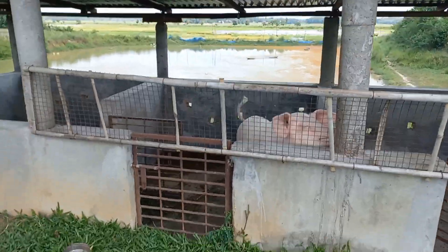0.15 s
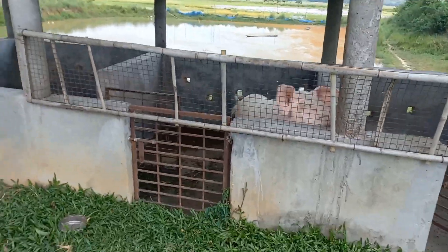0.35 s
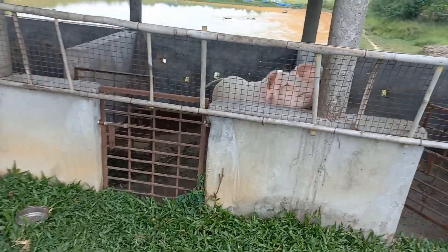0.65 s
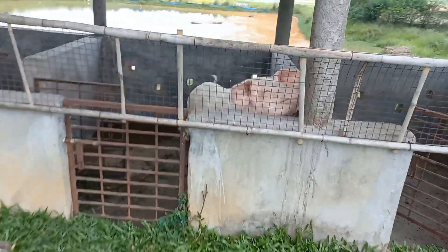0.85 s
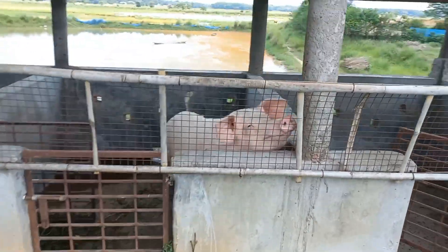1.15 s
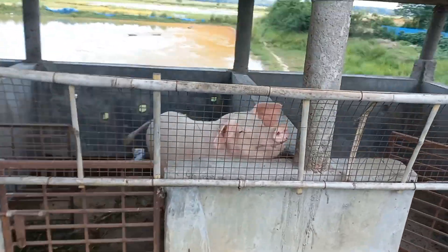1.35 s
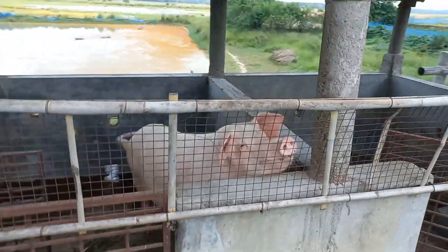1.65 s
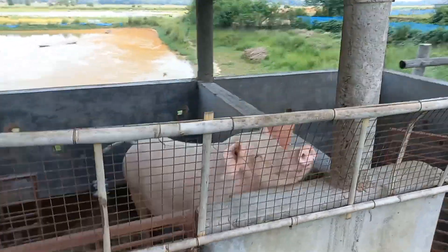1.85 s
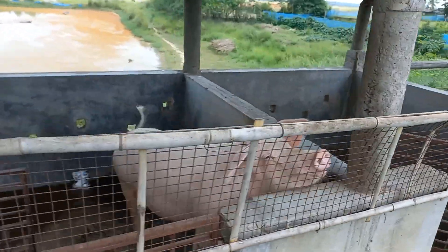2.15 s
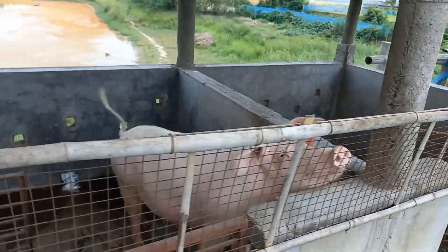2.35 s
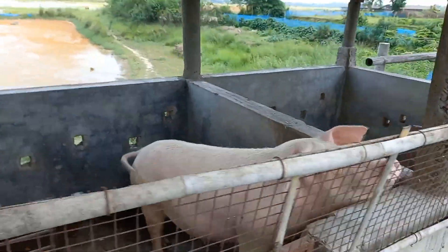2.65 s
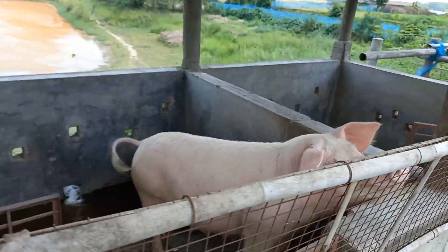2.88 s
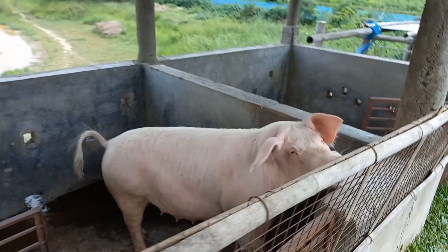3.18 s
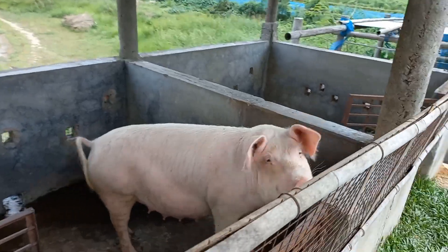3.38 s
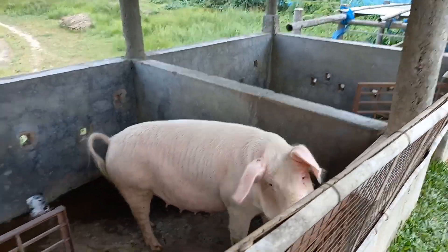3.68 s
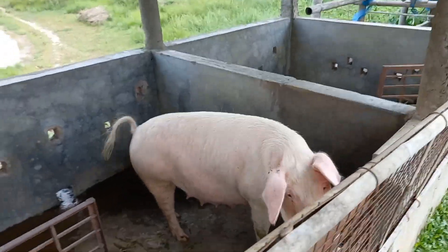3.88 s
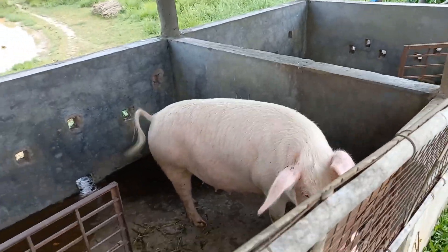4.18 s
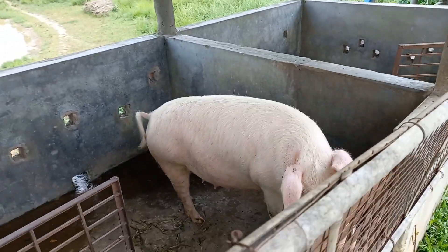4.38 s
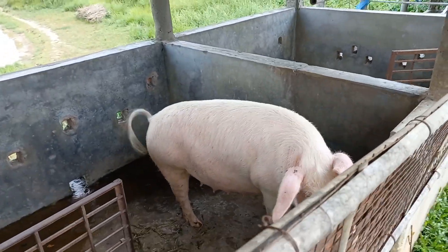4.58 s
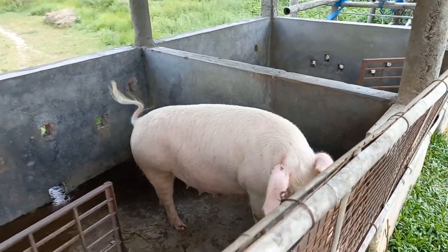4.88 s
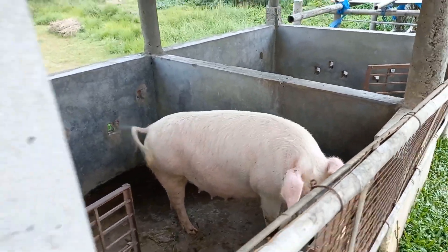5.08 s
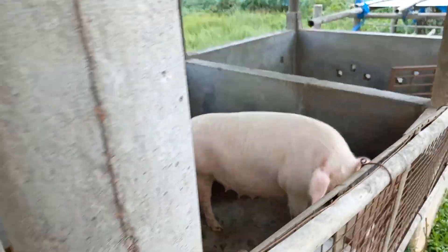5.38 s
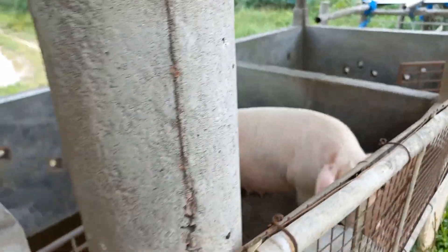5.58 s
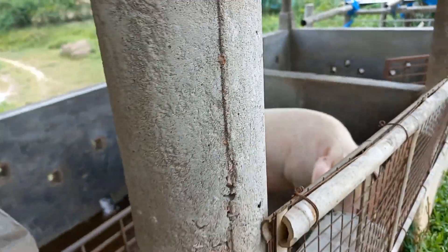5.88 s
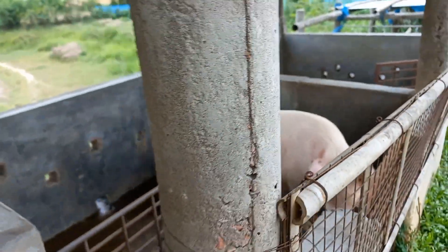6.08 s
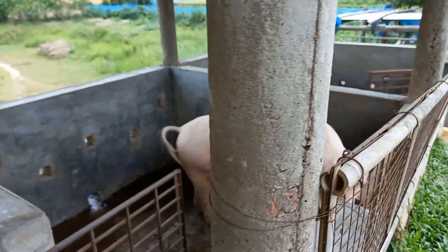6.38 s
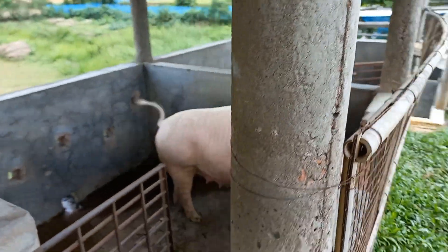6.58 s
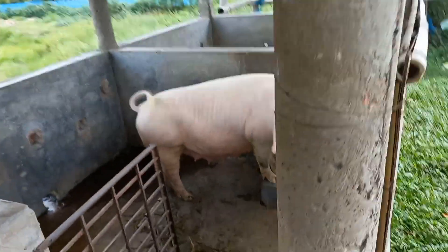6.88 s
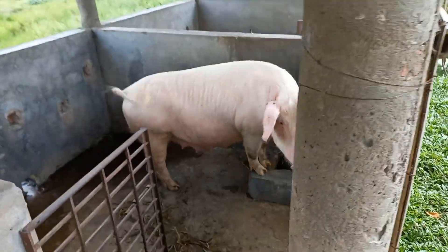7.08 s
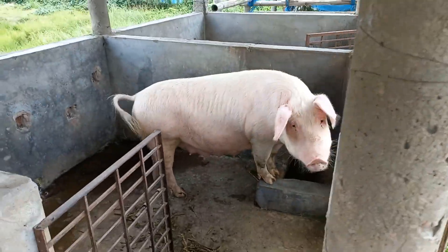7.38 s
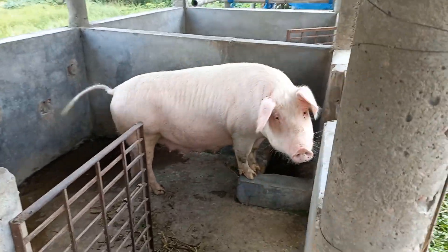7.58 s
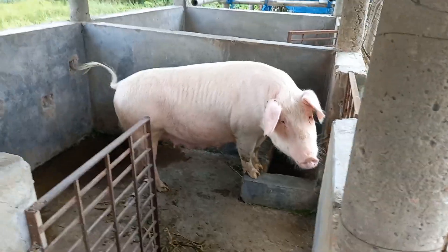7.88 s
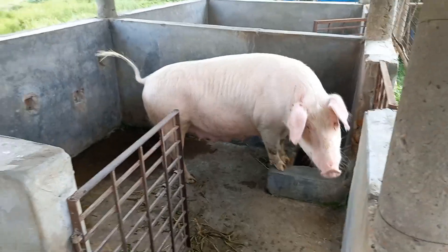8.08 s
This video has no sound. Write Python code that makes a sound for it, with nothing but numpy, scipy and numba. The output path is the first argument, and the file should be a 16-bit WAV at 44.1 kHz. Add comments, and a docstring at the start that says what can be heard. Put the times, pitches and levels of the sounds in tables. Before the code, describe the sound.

A large pig grunts continually at a farm, first softly, then loud, low and nasal. Around three seconds two calls crack into brief squeals, then shorter, more open and raspier grunts follow, easing toward the end. Bare concrete walls give a short hard echo. Someone walks through grass with soft swishes, a small bird chips, and a distant motor hums. A handheld microphone approaches the pen.

```python
"""A pig grunts two or three times a second, twice breaking into a squeal, in a roofed concrete pen.
Source and filter: uneven pulses of the vocal folds ring throat, mouth and snout; the walls answer with a short echo.
Someone walks through grass, heard as swelling hisses of noise and a few snapping stems.
A small bird chips in short upward whistles; a far motor drones as a wavering tone over the noise of the fields."""
import sys
import numpy as np
from scipy import signal
from scipy.fft import rfft, irfft
from scipy.io import wavfile
from scipy.ndimage import uniform_filter1d
from numba import njit

SR = 44100
rng = np.random.default_rng(int(sys.argv[2]) if len(sys.argv) > 2 else 0)


def file_out(sig):
    """Save sig as 16-bit WAV at sys.argv[1]."""
    # one column per channel
    cols = np.atleast_2d(sig).T
    # limit, then scale
    lim = np.clip(cols, -1, 1)
    pcm = np.round(lim * 32767).astype(np.int16)
    wavfile.write(sys.argv[1], SR, pcm)


N = 363384
T = np.arange(N) / SR
SIDES = np.array([[1], [-1]])  # signs of the left and right channels


def undb(db):
    """Logarithmic level: decibels to amplitude gain."""
    return 10 ** (np.asarray(db) / 20)


def curve(rows):
    """Linear interpolation: each column of a table, joined by straight lines in time."""
    s, *columns = np.transpose(rows)
    return [np.interp(T, s, c) for c in columns]


def unit(x):
    """Normalization: scale to rms 1."""
    return x / np.sqrt(np.mean(x ** 2))


def steady(x, span=0.011):
    """Automatic gain: hold the short-term rms near 1, keeping the single pulses."""
    size = int(span * SR)
    power = uniform_filter1d(uniform_filter1d(x ** 2, size), size)
    return x / np.sqrt(power + 0.014 * np.mean(power))


def cut(x, hz, kind, order=2):
    """Butterworth filtering: maximally flat pass band."""
    return signal.sosfilt(signal.butter(order, hz, kind, fs=SR, output="sos"), x)


def noise(points):
    """Spectral shaping: noise of rms 1 with a spectrum of (f/Hz, level/dB) points."""
    hz, db = np.transpose(points)
    f = np.arange(N // 2 + 1) * SR / N
    gain = undb(np.interp(np.log(f + 1), np.log(hz), db))
    return unit(irfft(rfft(rng.standard_normal(N)) * gain, N))


def walk(rate):
    """Random modulation: smooth drift of rms 1, with this many new values per second."""
    size = int(SR / rate)
    steps = np.repeat(rng.standard_normal(N // size + 1), size)
    return unit(uniform_filter1d(steps, size)[:N])


def add(out, s, sound):
    """Superposition: mix a sound in at time s."""
    i = max(int(s * SR), 0)
    out[i:i + len(sound)] += sound[:N - i]


@njit
def svf(x, hz, width):
    """State-variable resonance: band-pass with a moving centre and width."""
    y, b, l = np.empty(len(x)), 0., 0.
    for i in range(len(x)):
        g, k = np.tan(np.pi * hz[i] / SR), width[i] / hz[i]
        v = (b + g * (x[i] - l)) / (1 + g * (g + k))
        b, l, y[i] = 2 * v - b, l + 2 * g * v, k * v
    return y


def ring(x, hz, width_hz):
    """Damped resonance: one mode, gain 1 at its centre."""
    return svf(x + 1e-18, hz + np.zeros(len(x)), width_hz + np.zeros(len(x)))


ONSET_DB, SWELL_POWER = 10, 0.34  # a grunt starts this far under its crest; the bend of the swell
END_DB, FADE_POWER = 14.5, 0.67  # and stops this far under it
# as the push builds, the folds speed up and the jaw opens; after the crest both give way
PITCH_RISE_OCT_PER_S, PITCH_SAG_OCT_PER_S = 5.5, 2.5
THROAT_RISE_OCT_PER_S, THROAT_SAG_OCT_PER_S = 1.3, 1.5
MOUTH_RISE_OCT_PER_S, MOUTH_SAG_OCT_PER_S = 3.65, 0.27
# before the crest the sound moves from the nose to the mouth
MOUTH_OPEN_DB_PER_S, MOUTH_CLOSE_DB_PER_S = 57, 102
NASAL_FALL_DB_PER_S = 57
# the rasp is muffled until the lips part just before the crest, then grows to the end
RASP_SHUT_DB, RASP_OPEN_S, RASP_LINGER_DB_PER_S = 7, .058, 35
ROUGH_EDGE = .08  # the folds beat less evenly at either end


def grunt_shape(start, swell_s, fade_s, db, open_db, rasp_db, hz, rough, throat_hz, mouth_hz, nasal_db):
    """Breath pressure as common drive: level, pitch and jaw rise to a crest and give way; rows of (t/s, controls)."""
    u = np.linspace(-1, 1, 13)  # onset to end, crest at 0
    early, late = np.maximum(-u, 0), np.maximum(u, 0)
    before_s, after_s = early * swell_s, late * fade_s
    muffled = 1 - 2 ** -(before_s / RASP_OPEN_S) ** 4
    return np.transpose([
        start + swell_s - before_s + after_s,
        db - ONSET_DB * early ** SWELL_POWER - END_DB * late ** FADE_POWER,
        open_db - MOUTH_OPEN_DB_PER_S * before_s - MOUTH_CLOSE_DB_PER_S * after_s,
        rasp_db - RASP_SHUT_DB * muffled + RASP_LINGER_DB_PER_S * after_s,
        hz / 2 ** (PITCH_RISE_OCT_PER_S * before_s + PITCH_SAG_OCT_PER_S * after_s),
        np.clip(rough + ROUGH_EDGE * np.abs(u), 0, 1),
        throat_hz / 2 ** (THROAT_RISE_OCT_PER_S * before_s + THROAT_SAG_OCT_PER_S * after_s),
        mouth_hz / 2 ** (MOUTH_RISE_OCT_PER_S * before_s + MOUTH_SAG_OCT_PER_S * after_s),
        nasal_db + NASAL_FALL_DB_PER_S * before_s])


# pushes of air, one row a grunt, values at the crest: onset t/s, swell t/s, fade t/s, overall level/dB,
# mouth relative level/dB, snout rasp relative level/dB (both before the trims in grunts), pulse rate f/Hz,
# roughness 0-1, throat resonance f/Hz, mouth resonance f/Hz, nasal hum level/dB
GRUNT_PUSHES = [ (0.186, 0.081, 0.055, -15, -5.5, -8.5, 61.95, 0.62, 285, 1033, 4),
                (0.384, 0.074, 0.089, -17.5, -5.5, -8.5, 62.23, 0.56, 280, 1050, 6),
                (0.951, 0.079, 0.06, -5.5, -5.5, -11, 77.76, 0.66, 332, 1064, 6),
                (1.283, 0.12, 0.04, -7, -7, -14, 66, 0.52, 385, 997, 7),
                (1.643, 0.11, 0.045, -5.5, -9.5, -18.5, 126.3, 0.23, 463, 970, 1.5),
                (2.069, .12, 0.044, -6, -13, -18, 77.24, 0.3, 460, 1053, 4.5),
                (2.487, 0.13, 0.066, -8.5, -12, -12, 90.4, 0.47, 416.7, 1028, 6.5),
                (2.835, .11, 0.049, -6.5, -11, -18, 104.5, 0.42, 459.8, 1000, 5.5),
                (3.866, 0.042, 0.067, -5, -1.5, -12.5, 103.5, 0.49, 564, 1130, -8),
                (4.199, 0.046, 0.042, -6, -4.5, -14, 115.2, .38, 517.9, 1350, -7),
                (4.443, 0.059, 0.053, -10, -4.5, -11.5, 98.76, 0.63, 514.7, 1373, -7.5),
                (4.778, 0.057, 0.078, -10, -7, -8.5, 106, 0.67, 537.9, 1384, -9),
                (5.120, 0.061, 0.061, -10, -9.5, -12, 105.3, 0.7, 569.6, 1303, -5),
                (5.328, 0.044, 0.052, -14, -11, -9.5, 99.4, 0.81, 470.9, 1104, -33.5),
                (5.688, .07, .062, -7.5, -12, -11, 111.8, .72, 582.4, 1275, -6.5),
                (5.870, 0.039, 0.043, -23, -18, -16.5, 70.05, 0.76, 517.2, 1192, -11),
                (5.953, 0.0074, 0.052, -16.5, -10, -7.5, 108.8, 0.81, 539.8, 1177, -20),
                (6.308, 0.047, 0.095, -10.5, -13.5, -10, 103.5, 0.84, 520.3, 1003, -7),
                (7.147, 0.053, 0.11, -16.5, -8.5, -11.5, 79.9, 0.92, 381.7, 999.7, -11),
                (7.378, 0.071, 0.056, -20, -2, 4, 48.3, 0.6, 477.2, 1103, -2),
                (7.815, 0.11, 0.068, -13, -10.5, -11.5, 84.9, 0.76, 347.8, 1127, -4)]
# two calls that break into a squeal, one curve each: t/s, then the columns of a grunt from overall level on
SQUEAL_CURVES = [
    [(3.17, -15.5, -12.5, -14.5, 69.57, 0.51, 290, 773.3, 14.5),
     (3.24, -15, -16, -25, 89.36, 0.54, 350, 869, 0),
     (3.285, -10, -0.5, -15.5, 133.7, .35, 450, 1000, 14.5),
     (3.31, -7.5, -11, -13.5, 269.4, 0.072, 517, 1020, 0), (3.385, -13.5, 1, -11, 270.3, .08, 530, 1070, 6),
     (3.42, -17, -9, -13.5, 247, 0.13, 490, 1100, -9), (3.455, -13.5, -25, -35, 226.6, 0.28, 450, 1037, 0)],
    [(3.582, -10.5, -27, -33, 221.5, .12, 427, 1250, 11), (3.607, -9, -1, -20, 225.4, .09, 440, 1347, -20),
     (3.665, -16, -4.5, -15.5, 242, 0.089, 479, 1498, -10),
     (3.7, -17.5, -19.5, -59, 248.4, 0.12, 480, 1442, -22)],
]


def calls():
    """Sequence of control curves: all grunts and squeals, in order of time."""
    curves = [grunt_shape(*row) for row in GRUNT_PUSHES] + [np.array(c) for c in SQUEAL_CURVES]
    return sorted(curves, key=lambda c: c[0, 0])


@njit
def folds(hz, jitter, shimmer, chance):
    """Relaxation oscillation with jitter and shimmer: a pulse at each fold closure; also the time since it."""
    pulses, age, phase, k, last = np.zeros(len(hz) + 1), np.zeros(len(hz)), 0., 0, 0
    for i in range(len(hz)):
        step = hz[i] * np.exp(jitter[i] * chance[k, 0]) / SR
        phase += step
        if phase >= 1:
            phase, k, last = phase - 1, k + 1, i
            size = np.exp(shimmer[i] * chance[k, 1])
            # shared between two samples to place the closure finely
            pulses[i] += size * phase / step
            pulses[i + 1] += size * (1 - phase / step)
        age[i] = (i - last) / SR
    return pulses[:-1], age


# the low thump of the air pulses, relative to the nasal hum
THUMP_HZ, THUMP_WIDTH_HZ, THUMP_DB = 66, 15, -15.5


def throat(x, hz, nasal_db, chest_db, width_hz=185, nose_hz=250, nose_width_hz=110, notch_hz=690,
           chest_hz=166, chest_width_hz=34):
    """First formant with a side branch: the nose hums below the resonance and cuts off what lies above."""
    body = cut(ring(x, hz, width_hz), notch_hz, "low", order=7)
    hum = cut(ring(x, nose_hz, nose_width_hz), [200, 360], "band")
    chest = ring(x, chest_hz, chest_width_hz)  # the neck and chest boom along with the hum
    thump = ring(ring(x, THUMP_HZ, THUMP_WIDTH_HZ), THUMP_HZ, THUMP_WIDTH_HZ)
    voiced = body + undb(nasal_db) * (hum + undb(chest_db) * chest)
    return cut(voiced, 80, "high") + undb(THUMP_DB + nasal_db) * thump


def mouth(x, hz, rough, shut_width_hz=130, open_width_hz=340, upper_gap_hz=500, upper_db=-5,
          shut_hz=840, open_hz=1100):
    """Radiation damping of formants two and three: they rise as the jaw opens, sharp nearly shut, broad when agape."""
    width_hz = np.interp(hz, [shut_hz, open_hz], [shut_width_hz, open_width_hz])
    upper_hz = hz + upper_gap_hz
    second = ring(ring(x, hz, width_hz), hz, width_hz)
    third = ring(ring(x, upper_hz, width_hz), upper_hz, width_hz)
    third_gain = np.sqrt(np.abs(rough)) * undb(upper_db)
    return cut(second + third_gain * third, [700, 1850], "band", order=3)


# resonances of the snout, at rest: f/Hz, width f/Hz, level/dB
SNOUT_MODES = [(2070, 300, 5.5), (2644, 279, 13), (3184, 650, 3), (4400, 367, -3.5), (6160, 2350, -15.5)]
SNOUT_REST_HZ, SNOUT_FOLLOW = 462, 0.07  # they follow the throat's by this power, from rest at this throat resonance
SNOUT_WANDER = 0.038  # and each wanders by about this share as the snout works


def snout(x, throat_hz, nasal_db, drifts, leak_db=-27, nostril_hz=4850, nostril_width_hz=500, nostril_db=-1):
    """Parallel tube modes: drawn up with the throat's, each wandering a little; nostrils rasp in nasal calls."""
    lift = (throat_hz / SNOUT_REST_HZ) ** SNOUT_FOLLOW * np.exp(SNOUT_WANDER * drifts)
    modes = 0
    for k, (hz, width_hz, db) in enumerate(SNOUT_MODES):
        modes = modes + (-1) ** k * undb(db) * ring(x, hz * lift[k], width_hz)
    nostrils = undb(nostril_db + np.minimum(nasal_db, 0)) * ring(x, nostril_hz, nostril_width_hz)
    leak = undb(leak_db) * cut(x, 9850, "low")
    return cut(modes - nostrils + leak, 520, "high", order=3)


# single hard pulses of the folds: t/s, level/dB (before the trim in pops), mouth relative level/dB,
# snout relative level/dB
HARD_PULSES = [(0.85, -13, -12, -11), (0.88, -13, -5, -12), (0.911, -13, -13, -6.5), (.997, -5, -9.5, -38),
               (1.018, -6.5, -2, 1), (1.038, -6.5, -14, -6), (1.355, -9, -8, -8), (1.378, -10, 1.5, -25),
               (1.394, -2.5, -3, -9), (1.427, -2, -12, -11.5), (1.753, -6, -7, -1), (1.769, -5, -15, -3),
               (1.987, -20.5, -27, -9), (2.055, -12.5, -9, -9), (2.145, -5.5, -6, -26),
               (2.162, -8, -11, -9), (2.212, -7, -11, -3), (2.442, -25, -14, -13), (2.537, -11, -3.5, -23),
               (2.587, -5.5, -8, -19), (2.863, -14.5, -2, -7), (3.134, -13, -10.5, -15),
               (3.535, -16, -5, 3), (3.823, -1.5, -5.5, -14), (4.147, -17, -19, 2), (4.163, -10, -7.5, -4),
               (4.215, -7.5, -4.5, -3.5), (4.401, -13.5, -9, -4), (4.414, -15, -0.5, -7),
               (4.459, -11, -2, 0), (4.532, -10.5, -0.5, 1.5), (4.748, -30, -20, -8),
               (5.342, -13.5, -16, -2), (5.643, -21.5, -17, -6.5), (5.957, -13.5, -14, -1.5),
               (6.259, -21.5, -20, -15), (7.383, -17, -0.5, -2), (7.447, -16, 2.5, -1.5),
               (7.759, -25.5, -6, -0.5)]
HOLD_S, HOLD_DB = 0.0072, -7.5  # the folds hold back around a hard pulse
# boom of neck and chest, stronger once the pig turns to face the listener: t/s, level/dB relative to the nasal hum
CHEST_BOOM = [(6.5, -11.5), (7.1, 6)]


def grunts(throat_db=0, mouth_db=1, snout_db=3, air=0.13, rasp=0.53, fade_s=0.023, bite=1.0, slack_db=8,
           cry_hz=3300, cry_width_hz=170, cry_db=9):
    """Source-filter voice: rattling folds and a puff of air after each closure drive three parts of the airway."""
    voice = calls()
    db, open_db, rasp_db, hz, rough, throat_hz, mouth_hz, nasal_db = curve(np.vstack(voice))
    pulses, age = folds(hz, .55 * rough + .01, 0.75 * rough, rng.standard_normal((N // 50, 2)))
    puffs = rng.standard_normal(N) * (np.exp(-age / .002) + .07) * np.abs(rough) ** .7
    sounding = sum((T > g[0][0]) & (T < g[-1][0]) for g in voice)
    held = sum(np.exp(-np.minimum(np.abs(T - s) / HOLD_S, 10) ** 2) for s, *_ in HARD_PULSES)
    effort = undb(db + HOLD_DB * held) * uniform_filter1d(1. * sounding, int(fade_s * SR))

    drive = pulses + air * puffs
    low = undb(throat_db) * steady(throat(drive, throat_hz, nasal_db, curve(CHEST_BOOM)[0]))
    middle = undb(open_db + mouth_db) * steady(mouth(drive, mouth_hz, rough))

    snap = np.exp(bite * rough * walk(90)) * (pulses + rasp * puffs)  # some closures snap much harder than others
    tense = np.clip(hz / 250, 0, 1) ** 4
    cry = tense * undb(cry_db) * ring(snap, cry_hz, cry_width_hz)  # a tense, high voice rings sharply
    dull_db = slack_db * np.minimum(np.log2(hz / 85), 0)  # slow, slack folds close softly
    drifts = np.array([walk(10) for _ in SNOUT_MODES])
    high = undb(rasp_db + snout_db + dull_db) * steady(snout(snap, throat_hz, nasal_db, drifts) + cry)
    return effort * (low + middle + high)


def pops(pop_db=3, puff_s=0.0038, puff=0.15, lowest_hz=450, hum_db=-9, jaw_hz=800, damped_width_hz=320):
    """Impulse response of the airway: one hard pulse and its puff; between calls the jaw is nearly shut."""
    out, t, voice = np.zeros(N), T[:SR // 25], calls()
    *_, rough, throat_hz, mouth_hz, nasal_db = curve(np.vstack(voice))
    chest_db, = curve(CHEST_BOOM)
    pulse = 1. * (t == 0)
    for s, db, open_db, rasp_db in HARD_PULSES:
        i = int(s * SR)
        push = pulse + puff * rng.standard_normal(len(t)) * np.exp(-t / puff_s)
        hz, lips_hz = max(throat_hz[i], lowest_hz), jaw_hz
        if any(g[0][0] < s < g[-1][0] for g in voice):
            hz, lips_hz = throat_hz[i], mouth_hz[i]
        parts = (throat(pulse, hz, nasal_db[i] + hum_db, chest_db[i]),
                 mouth(push, lips_hz, rough[i], shut_width_hz=damped_width_hz),
                 snout(push, hz, nasal_db[i], rng.standard_normal(len(SNOUT_MODES))))
        low, middle, high = (p / np.abs(p).max() for p in parts)
        add(out, s, undb(db + pop_db) * (low + undb(open_db) * middle + undb(rasp_db) * high))
    return out


def near_wall(x, delay_s=.007, shift=0.1497, wall_db=-9):
    """Comb filtering: the nearest wall's reflection drifts in delay as pig and listener move, shifting the colour."""
    return x + undb(wall_db) * np.interp(T - delay_s * (1 + shift * walk(2)), T, x)


# standing waves between the walls: f/Hz, level/dB
STANDING_WAVES = [(165, -3.5), (232, -3), (275, -6.5), (345, 1), (446, -5), (496, -9), (600, -1),
                  (1060, -27), (1296, -5.5)]
# first reflections from floor, trough and walls: delay t/s, level/dB below the treble
FIRST_REFLECTIONS = [(.0019, -11), (.0094, -9.5), (0.0145, -8), (0.0191, -11)]
# decay of the echo by band: f/Hz, reverberation time t60 t/s, left-right likeness 0-1
PEN_DECAY = [(130, 0.48, 0.95), (435, 0.34, 0.86), (1000, 0.33, 0), (2600, 0.19, 0.54), (6640, 0.55, 0.2)]


def pen(x, echo_db=-6, slap_db=-7, slap_s=0.0087, lag_s=.0001, shade_db=-6, standing_width_hz=32, wall_db=0):
    """Room acoustics: standing waves, reflections and short reverberation; the left hears it later and duller."""
    x = x + sum(undb(db) * ring(x, hz, standing_width_hz) for hz, db in STANDING_WAVES)
    t = T[:SR // 2]
    f = np.fft.rfftfreq(len(t), 1 / SR)
    treble = np.clip((f - 700) / 1500, 0, 1)
    log_hz, tail = np.log(np.array(PEN_DECAY)[:, 0]), 0
    for (hz, t60, alike), pick in zip(PEN_DECAY, np.eye(len(PEN_DECAY))):
        alike = np.clip(alike, 0, 1)
        mid, side = rng.standard_normal((2, len(t)))
        pair = np.sqrt((1 + alike) / 2) * mid + np.sqrt((1 - alike) / 2) * side * SIDES
        late = np.exp(-np.log(1000) * t / t60) * (t > .008)
        early = np.exp(-t / slap_s)
        late, early = late / np.linalg.norm(late), early / np.linalg.norm(early)
        # the walls scatter the treble early
        echoes = undb(echo_db) * rfft(pair * late) + undb(slap_db) * np.sqrt(treble) * rfft(pair * early)
        tail = tail + echoes * np.sqrt(np.interp(np.log(f + 1), log_hz, pick))
    bounces = sum(undb(db + wall_db) * np.exp(-2j * np.pi * f * s) for s, db in FIRST_REFLECTIONS)
    bounces = bounces * (1 - 0.74 * treble)
    direct = (1 + bounces) * np.exp(-1j * np.pi * f * lag_s * SIDES)
    shade = undb(SIDES / 2 * shade_db * treble ** 2)
    response = np.roll(irfft((direct + tail) * shade), 64, axis=1)  # room for the right channel's lead
    return undb(-4.5) * signal.fftconvolve(x[None], response, axes=1)[:, 64:N + 64]


# steps through grass: t/s at the height of the swish, level/dB (before the trim in grass), length t/s
GRASS_STEPS = [(0.807, -36.5, .17), (1.093, -50.5, 0.28), (1.526, -44, 0.21), (1.719, -39.5, 0.14),
               (2.149, -43.5, 0.042), (2.324, -42, 0.21), (2.509, -44, 0.14), (2.682, -42.5, 0.11),
               (3.033, -34, 0.097), (3.501, -47, 0.21), (3.658, -36, 0.09), (3.892, -39, .03),
               (7.108, -43.5, 0.14), (7.907, -45.5, 0.12), (8.105, -50, 0.049)]
STEP_RISE_SHARE, STEP_FALL_SHARE = 0.55, .55  # of a step's length
# faint rustle between steps, fading once the walker reaches the pen: t/s, level/dB (before the same trim)
FAINT_RUSTLE = [(0, -62), (1.2, -63), (3.6, -51), (4.1, -66), (8.2, -62)]


def footfalls():
    """Energy addition: the power of each step swells and dies away over a faint rustle; returns amplitude."""
    power = undb(curve(FAINT_RUSTLE)[0]) ** 2
    for s, db, length_s in GRASS_STEPS:
        width_s = length_s * np.where(T < s, STEP_RISE_SHARE, STEP_FALL_SHARE)
        power = power + undb(db) ** 2 / (1 + ((T - s) / width_s) ** 2 / 2) ** 4
    return np.sqrt(power)


# stems snapping: t/s, peak level/dB (before the trim in grass)
STEM_SNAPS = [(0.864, -13), (.883, -21), (7.437, -16)]
SNAP_S = .0006  # decay of a snap
# relative spectrum of the hiss: f/Hz, level/dB
GRASS_SPECTRUM = [(200, 0.5), (700, 1), (1500, 2), (3000, 2), (5000, -1.5), (8000, -5), (12000, 1),
                  (16000, -8.5)]


def grass(swish_db=6, snap_db=2, pan_db=-3.0, grain_db=2.0):
    """Friction noise and brittle fracture: blades hiss past the feet at every step; now and then a stem snaps."""
    swish = footfalls() * undb(swish_db + grain_db * walk(300))
    snaps, t = np.zeros(N), T[:SR // 100]
    for s, db in STEM_SNAPS:
        crack = cut(rng.standard_normal(len(t)) * np.exp(-t / SNAP_S), 3116, "high")
        add(snaps, s, undb(db + snap_db) * crack / np.abs(crack).max())
    return np.array([undb(side * pan_db / 2) * (swish * noise(GRASS_SPECTRUM) + snaps) for side in (1, -1)])


# bird chips: t/s, peak level/dB (before the trim in bird), pitch before the flick f/Hz
BIRD_CHIPS = [(0.064, -35, 5260), (0.677, -20, 4175), (1.208, -30, 4531), (2.705, -36, 4300),
              (2.829, -34.5, 4430), (3.018, -19.5, 4450), (3.562, -29.5, 4630), (4.348, -36, 4700),
              (5.647, -36.5, 4593), (6.174, -29.5, 4595), (6.795, -30, 4480), (7.277, -26.5, 4610),
              (7.812, -27, 4588)]


def bird(bird_db=-2, attack_s=0.0047, decay_s=0.0075, sweep=9, flutter=0.045, lead_s=0.0088, lead_db=-14,
         lead_ratio=1.2):
    """Frequency modulation: a wavering whistle flicks up, just after a fainter, higher one; the lowest stay level."""
    out, t = np.zeros(N), T[:SR // 20] - 1 / 40  # the peak lies at t = 0
    waver = flutter * walk(500)
    stretches = np.exp(0.18 * rng.standard_normal(len(BIRD_CHIPS)))
    for (s, db, hz), stretch in zip(BIRD_CHIPS, stretches):
        lively, i = np.clip((hz - 4100) / 450, 0, 1), int(s * SR)
        bend = sweep * np.maximum(t, 0) / stretch + waver[i:i + len(t)]
        phase = 2 * np.pi * np.cumsum(hz * np.exp(lively * bend)) / SR
        width_s = np.where(t < 0, attack_s, decay_s * stretch)
        shape = undb(db + bird_db) * np.exp(-.5 * (t / width_s) ** 2)
        add(out, s + t[0], shape * np.sin(phase))
        add(out, s + t[0] - lead_s, lively * undb(lead_db) * shape * np.sin(lead_ratio * phase))
    return out


def wavering_tone(hz, waver_hz, rate):
    """Phase integration: a sine whose frequency drifts at random."""
    return np.sin(2 * np.pi * np.cumsum(hz + waver_hz * walk(rate)) / SR)


# relative spectrum of the open-air murmur: f/Hz, level/dB
FIELDS_SPECTRUM = [(25, -53), (45, -26.5), (70, 4.5), (95, 12.5), (135, -6.5), (300, -10), (600, -9),
                   (1000, -19), (2500, -12), (8000, -31.5)]
# level of murmur and motor over time: t/s, level/dB
OPEN_AIR = [(0, -5.5), (.7, 1.5), (1.8, -12.5), (3.5, -1.5), (4.7, -12.5), (6.7, -9), (7.3, -1.5),
            (8.2, -13.5)]
# thin far whine: f/Hz, mean level/dB
FAR_WHINE = [(1960, -59), (2110, -55), (2260, -56), (2560, -62)]
FIELDS_DB, MOTOR_HZ, MOTOR_DB = -39.5, 90.2, -43  # levels before the open-air curve


def fields(side_db=-7, swell_db=2, waver_hz=2.67, whine_waver_hz=6, drone_side_db=-9):
    """Diffuse and tonal background: open-air murmur, a far motor's wavering drone and a thin whine that soon fades."""
    # the second drone, independent, widens the first between left and right
    drone, spread = (wavering_tone(MOTOR_HZ, waver_hz, 14) * undb(2.5 * walk(9)) for _ in range(2))
    motor = undb(MOTOR_DB) * (unit(drone) + undb(drone_side_db) * unit(spread) * SIDES)
    air = noise(FIELDS_SPECTRUM) + undb(side_db) * noise(FIELDS_SPECTRUM) * SIDES
    murmur = undb(FIELDS_DB + swell_db * walk(2.796)) * air
    whine = sum(undb(db + 2 * walk(15)) * unit(wavering_tone(hz, whine_waver_hz, 19.3)) for hz, db in FAR_WHINE)
    whine_fade = np.clip((1 - T) / .5, 0, 1)  # from 0.5 s, silent at 1 s
    return undb(curve(OPEN_AIR)[0]) * (murmur + motor) + whine * whine_fade


def scene(bird_echo_db=-3):
    """Superposition: the pig sounds through the pen; the bird outside rings it too; grass and fields lie around."""
    pig = near_wall(grunts() + pops())
    chips = bird()
    return pen(pig + undb(bird_echo_db) * chips) + chips + grass() + fields()


TOP_HZ = 15800  # upper limit of the sound


def record(dry):
    """Saturation and band limiting: round the loudest peaks and cut the top."""
    rounded = dry / (1 + dry ** 4) ** (1 / 4)
    return signal.sosfilt(signal.ellip(8, .2, 70, TOP_HZ, fs=SR, output="sos"), rounded)


dry = scene()
out = record(dry)
file_out(out)
```